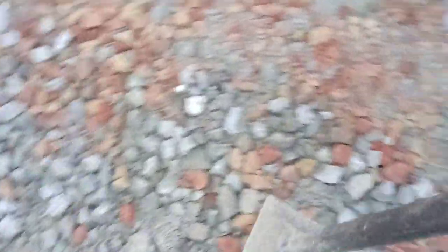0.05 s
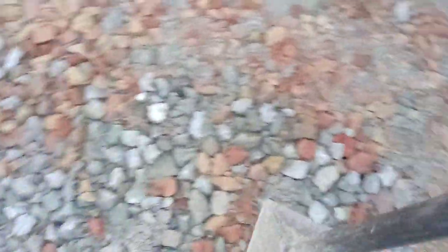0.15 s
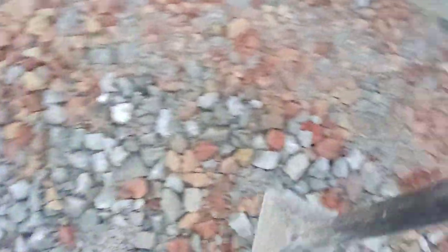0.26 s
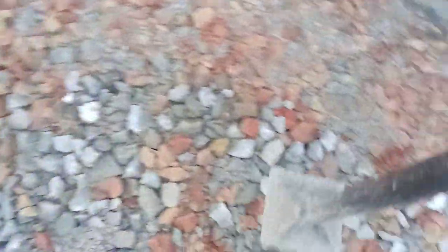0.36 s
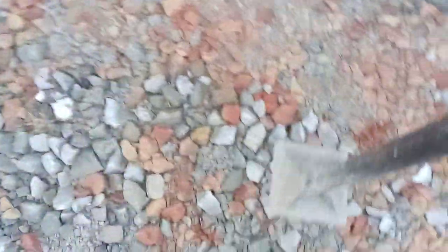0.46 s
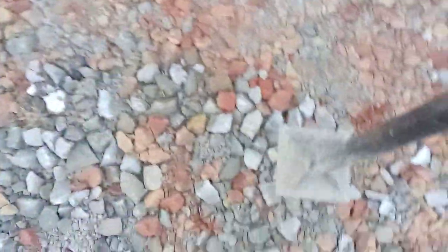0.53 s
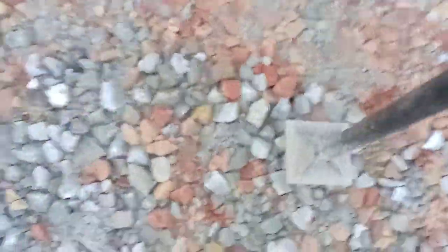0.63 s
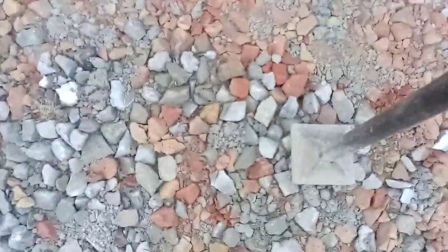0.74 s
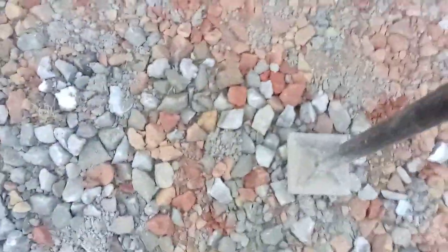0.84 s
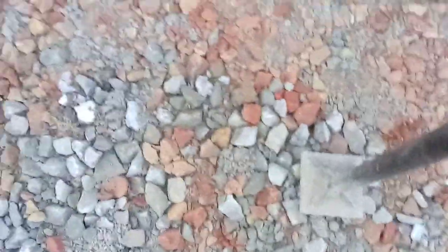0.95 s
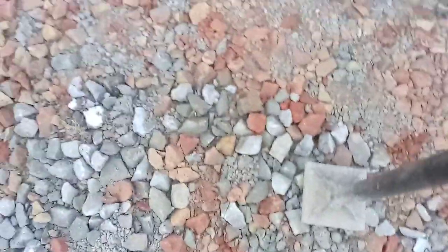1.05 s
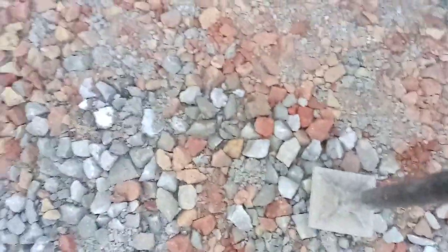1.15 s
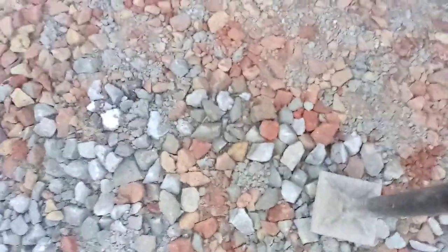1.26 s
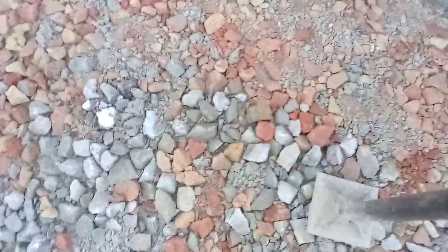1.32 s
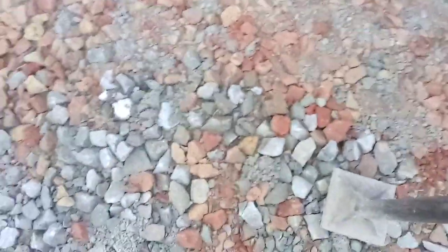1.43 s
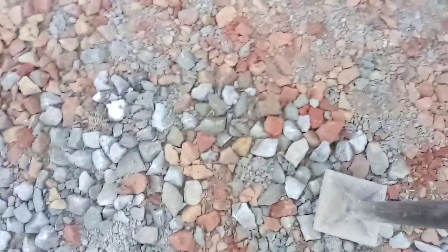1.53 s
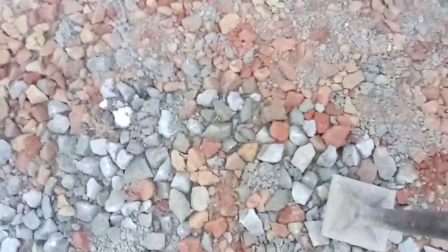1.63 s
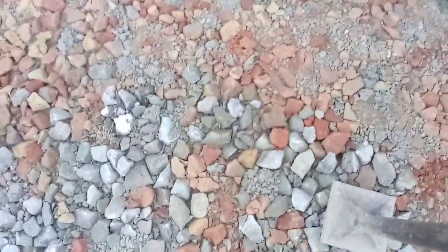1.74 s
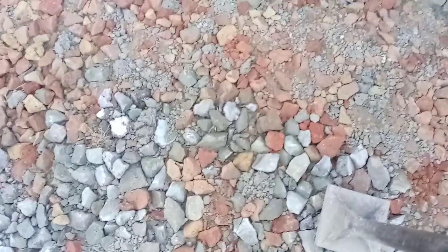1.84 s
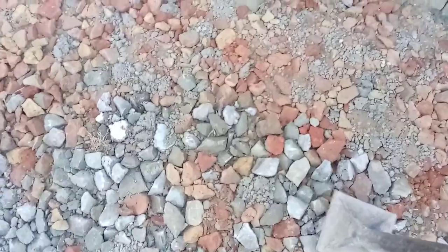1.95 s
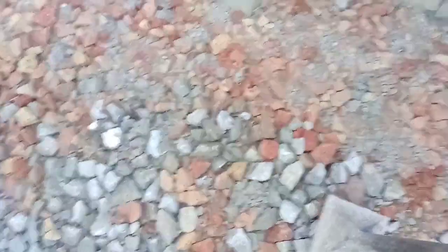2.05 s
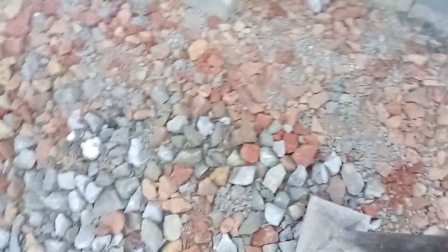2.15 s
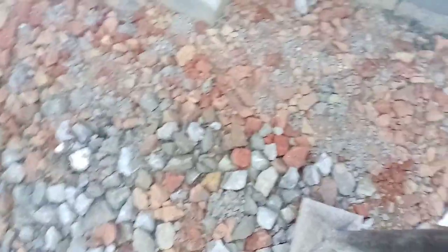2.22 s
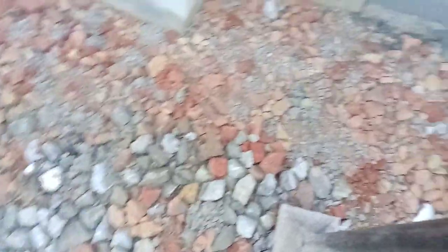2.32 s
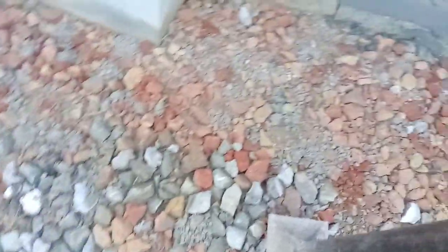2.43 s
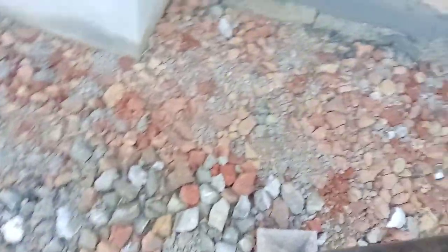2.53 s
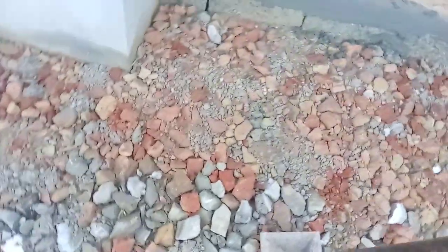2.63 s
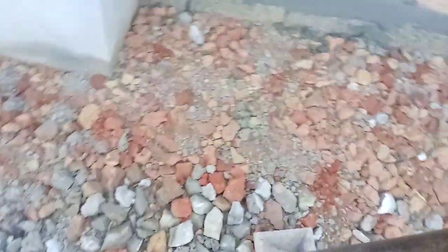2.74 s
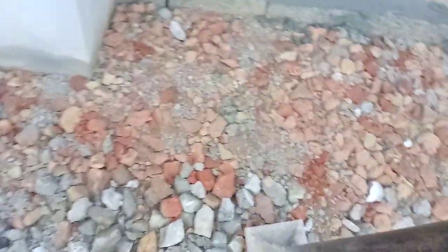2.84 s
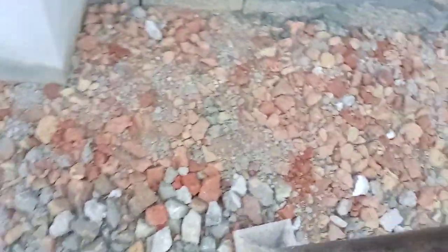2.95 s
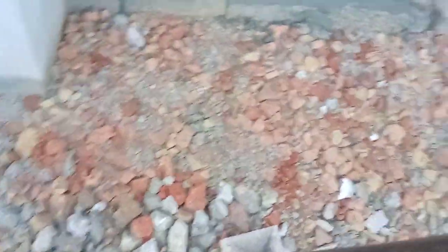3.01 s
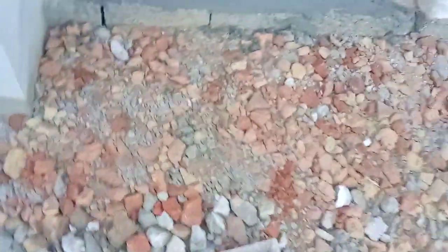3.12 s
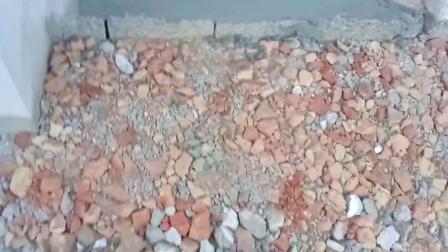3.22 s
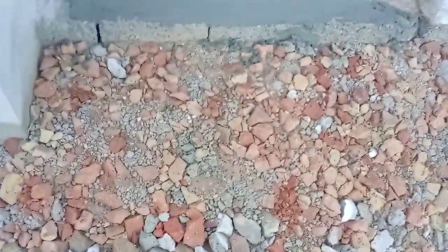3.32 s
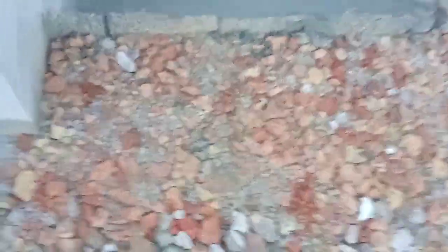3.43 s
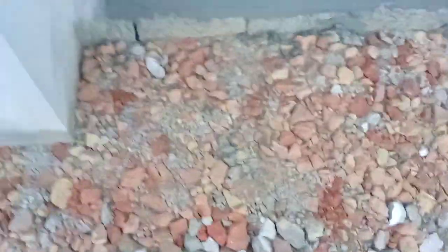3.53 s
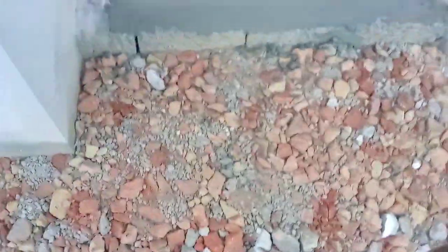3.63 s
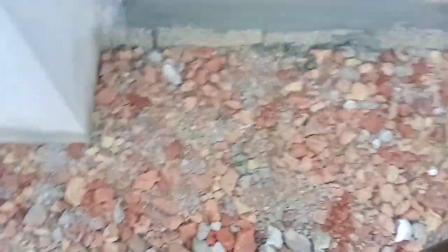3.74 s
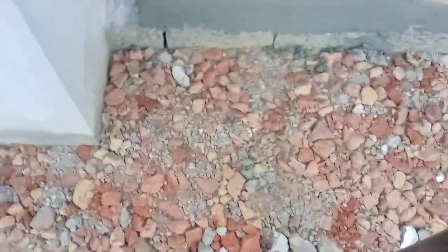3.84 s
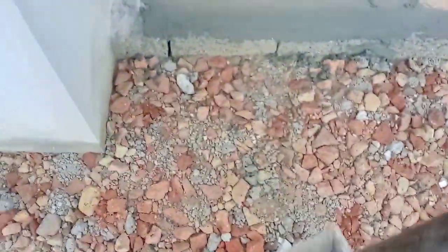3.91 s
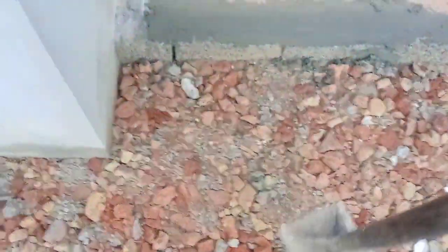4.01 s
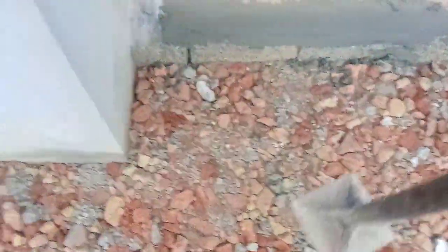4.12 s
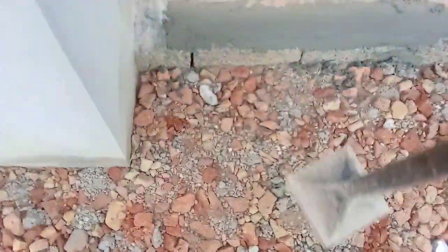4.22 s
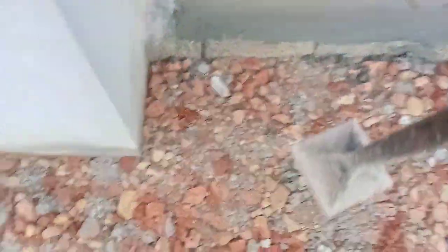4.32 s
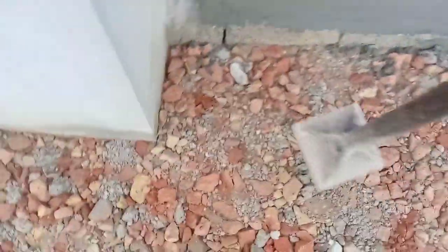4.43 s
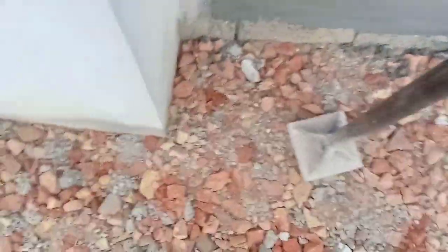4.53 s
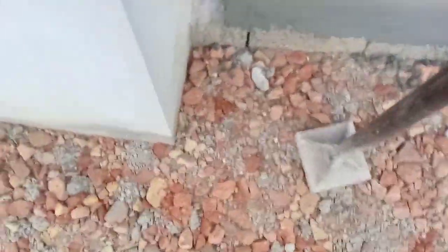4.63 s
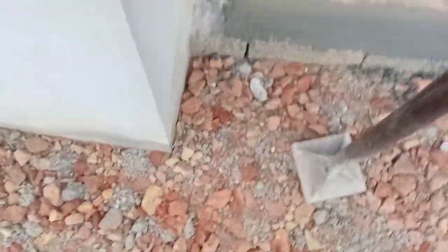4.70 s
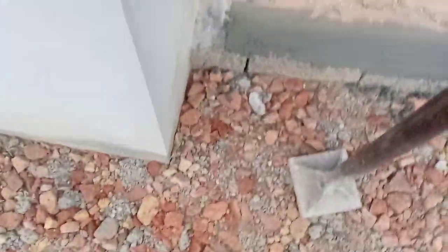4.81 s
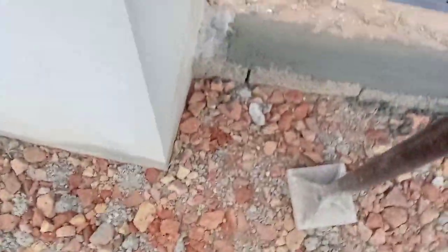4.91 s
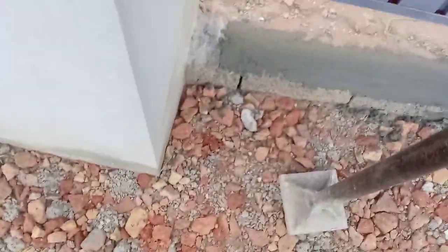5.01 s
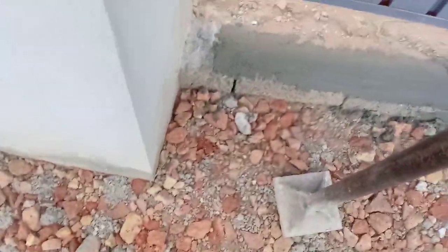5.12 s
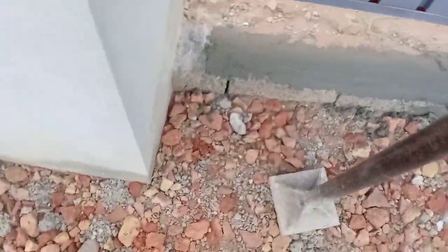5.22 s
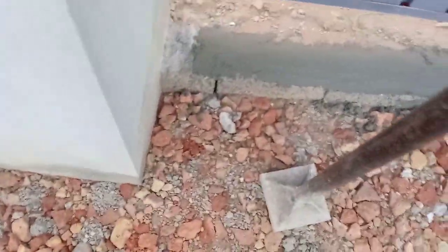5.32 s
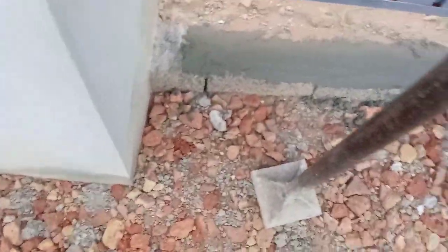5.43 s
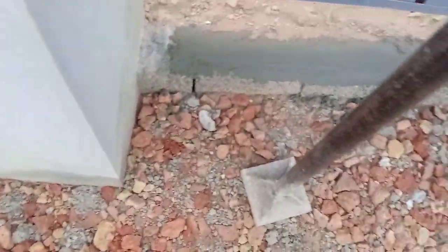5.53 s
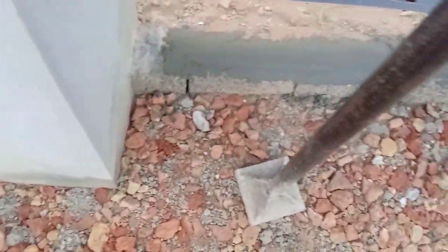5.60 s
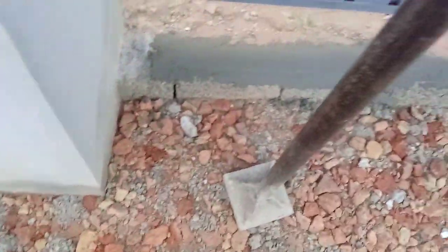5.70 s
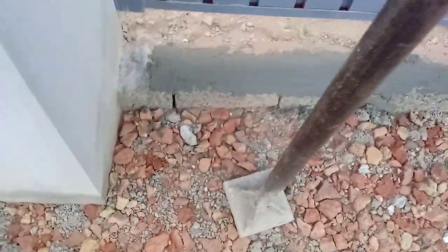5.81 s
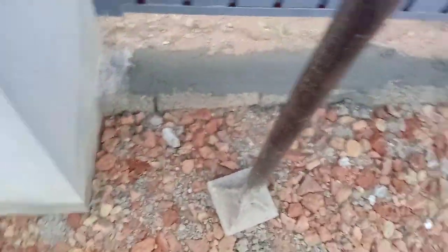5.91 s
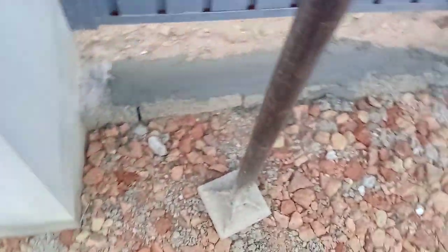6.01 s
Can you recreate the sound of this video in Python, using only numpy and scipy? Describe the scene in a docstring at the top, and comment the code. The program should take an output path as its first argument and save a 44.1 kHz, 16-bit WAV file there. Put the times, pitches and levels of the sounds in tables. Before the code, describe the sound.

A faint low outdoor rumble and soft hiss fill a walled yard, with quiet, rapid, even ticking throughout. At about 0.6 seconds a steel hand tamper lands close by on broken brick and gravel, giving a crunch, a dull thud and a short metallic ring. Feet shift softly just after. From 1 to 2.5 seconds the plate grazes the stones with light clinks, the clearest a gritty one near 1.9 seconds. Small distant birds chirp faintly, mostly between 2.8 and 4.5 seconds, while a few stones knock together. Shoes scuff on the gravel at about 4.3 seconds. At 4.5 seconds comes the second and loudest blow, a sharp crunch with a heavy thud and a bright ring, leaving a low rumble that fades over a second or so. Soft footfalls and tiny clinks follow until about 5.4 seconds, and the background carries on to 6 seconds.

```python
"""A low outdoor murmur, faint even ticking and small far-off birds are heard in a walled yard.
A steel hand tamper comes down twice on broken brick and gravel, first flat, then on its edge.
Each impact crushes stones, thuds into the ground and excites the modes of the plate; the second
leaves a long rumble by the wall. After each blow feet shift on the gravel, the plate rings softly
as it grazes stones, and stones knock together."""
import sys
import numpy as np
from scipy import signal
from scipy.fft import rfft, irfft, next_fast_len
from scipy.io import wavfile

SR = 44100
rng = np.random.default_rng(int(sys.argv[2]) if len(sys.argv) > 2 else 0)


def output_pcm(signal):
    """Save a mono or channel-first signal as 16-bit PCM at the path in sys.argv[1].

    Samples are clipped to [-1, 1] before scaling.
    """
    pcm = np.clip(np.atleast_2d(signal).T, -1, 1) * 32767
    wavfile.write(sys.argv[1], SR, np.round(pcm).astype(np.int16))


N = 267318
TIME = np.arange(N) / SR

# Noise spectra. Each row: frequency in Hz, relative level in dB.
MURMUR_SPECTRUM = [(20, -5), (45, -7), (75, 4.5), (120, 7), (170, -9.5), (260, -31.5), (500, -60.5)]
AIR_SPECTRUM = [(200, 2.5), (300, -3.5), (500, -7), (900, -4.5), (1130, -12), (1250, 3.5), (1400, -14),
                (2000, -12.5), (3200, -14), (5500, -14), (7500, -27.5), (8400, -35), (11000, -32),
                (14000, -33.5)]
CRUNCH_SPECTRUM = [(100, 2), (250, 5), (600, 0.5), (1100, 7.5), (1600, 3), (3000, -1.5), (4800, -3),
                   (6100, 0), (7000, -9), (8200, -18), (13500, -31), (15200, -21.5), (16000, -12)]
SCUFF_SPECTRUM = [(100, -24.5), (300, -6), (700, -3), (1000, -19), (1400, -5), (1900, 0), (2400, 0),
                  (3200, -2), (4300, 0.5), (5000, -4.5), (6200, -9), (7500, -19.5), (10000, -42),
                  (15000, -28.5)]
STEP_SPECTRUM = [(40, -68), (80, 21), (130, 3), (200, -10), (550, -7.5), (1000, -43.5), (3000, -68)]
GRIT_SPECTRUM = [(100, -25), (300, 12.5), (700, -2), (1400, 3.5), (2300, -3.5), (4500, 6.5), (6200, 4),
                 (8000, -16.5), (13000, -20), (15200, -10), (16000, -20)]
# Slow level contours. Each row: time in seconds, base level in dB.
MURMUR_CONTOUR = [(0.0, -61.5), (1.62, -58), (1.89, -51), (2.11, -59.5), (3.22, -61), (3.46, -55.5),
                  (4.25, -54.5), (4.64, -49), (5.23, -49), (6.06, -67)]
AIR_CONTOUR = [(0, -65), (1, -64.5), (2.5, -60.5), (4.2, -63), (5, -67.5), (6.06, -61.5)]
TICK_CONTOUR = [(0, -58), (.25, -49), (.9, -54), (1.5, -49), (2.4, -48.5), (3.1, -52.5), (3.6, -53),
                (3.9, -45), (5.5, -54), (6.06, -59)]
# Bands of thin hiss. Each row: centre in Hz, resonator width in Hz, level in dB.
HISS_BANDS = [(8870, 480, -83), (15100, 1000, -85.5)]
# Bird calls. Each row: start in seconds, length in seconds, middle pitch in Hz, glide in octaves,
# level in dB.
BIRD_CALLS = [(0.124, 0.12, 5580, 0.51, -62.5), (2.788, .09, 3780, -.23, -55.5),
              (3.054, 0.21, 3390, 0.18, -58), (3.348, 0.13, 4620, .26, -55.5),
              (3.62, .15, 3350, 0.14, -55.5), (3.95, 0.086, 3840, -0.46, -52),
              (4.203, 0.25, 3130, 0.045, -54.5), (5.24, 0.13, 4620, 0.33, -61)]
# Modes of plate and shaft. Each row: frequency in Hz, t60 (time to fall 60 dB) in seconds,
# then relative level in dB when struck flat, struck on the edge and grazed.
TAMPER_MODES = [(289.7, 0.51, -38.5, -41, -24), (901, 0.12, -38, -54.5, -16.5),
                (1242, 0.27, -12.5, -32.5, -0.5), (1340, 0.87, -32.5, -28, -6),
                (1861.6, 0.46, -27, -29.5, -8), (2370, 0.26, -54, -58.5, -28), (2458, 0.11, -19, -32, -6.5),
                (2910, 0.31, -47, -40, -24), (3036, 0.47, -38, -41, -17), (3126, 0.47, -46, -32, -24),
                (3142, 0.35, -37, -41.5, -10.5), (3710, 0.38, -28.5, -33.5, -15),
                (3883, .31, -30.5, -29, -6), (4020, 0.37, -47, -38, -21), (4130, .26, -43, -38, -35),
                (4700, 0.25, -51.5, -27.5, -10.5), (5420, 0.33, -43.5, -29, -13.5),
                (5484, 0.49, -58.5, -30.5, -11.5), (5820, .15, -43, -42.5, -27),
                (6060, 0.2, -51, -26.5, -4), (5830, 0.1, -31, -31, -17), (6028, .17, -48, -33, -2),
                (5940, 0.068, -34, -14, -0.5), (6065, 0.14, -31, -22.5, -18), (6350, 0.14, -51, -27, -8),
                (6450, 0.12, -50.5, -24.5, -30), (7030, .14, -41, -38, -11), (7240, 0.2, -52.5, -47.5, -14)]
MODE_HZ, MODE_T60, FLAT_DB, EDGE_DB, GRAZED_DB = np.transpose(TAMPER_MODES)
# Tamper blows. Each row: start in seconds, sinking-in time in seconds, share on the edge from 0 to 1,
# crunch in dB, thud in dB, thud pitch in Hz, yard echo in dB, wall rumble in dB.
TAMPER_BLOWS = [(.622, 0.015, 0, -22, -26.5, 106.3, -37, -56.5),
                (4.485, .007, 1, -15.5, -14, 119.6, -53, -32)]
# Reverberation. Each row: frequency in Hz, relative level in dB, t60 in seconds.
YARD_ECHO = [(200, 5, 0.13), (704, -2, 0.64), (1500, -17, 0.48), (2106, 6, 0.43), (3000, 6, 0.28),
             (4000, -3, 0.54), (5000, 5.5, 0.38), (5830, -12.5, 0.28), (8000, -56, .25), (15000, -40, .2)]
WALL_RUMBLE = [(50, -25, 3.1), (95, 1.5, 1.5), (154, 1, 3.5), (204, -6.5, 2.13), (370, -5, 2.51),
               (686, -2, 1.6), (920, -14, 1.15), (1180, -3.5, 1.35), (1500, -20, 1.18), (2760, -13, 0.49),
               (4760, -29, 0.29), (9000, -58.5, .3)]
# Feet on gravel. Each row: start in seconds, level in dB, rise in seconds, t60 in seconds.
FOOT_SCUFFS = [(1.14, -61, 0.066, 1), (3.31, -63.5, 0.12, 1), (3.885, -50.5, 0.05, 0.11),
               (4.295, -34.5, 0.037, 0.53), (4.325, -37.5, 0.053, 0.55)]
FOOTFALLS = [(0.781, -44.5, 0.024, 0.23), (0.827, -39.5, 0.024, 0.1), (0.995, -45, 0.044, 0.35),
             (1.931, -47.5, 0.014, 0.65), (3.92, -44, 0.045, 0.12), (4.285, -38.5, 0.0196, 0.26),
             (5.161, -39, 0.0095, 0.18), (5.37, -39, 0.045, 0.24)]
# Resonances of scuffed gravel. Each row: centre in Hz, width in Hz, relative gain in dB.
GRAVEL_RESONANCES = [(634, 69, -1), (1230, 62, 3), (2300, 250, -5), (3140, 350, -0.5), (3740, 140, -8),
                     (4790, 190, -0.5)]
# The plate grazing stones. Each row: start in seconds, ring gain in dB, contact time in seconds,
# favoured pitch in Hz, grit level in dB.
PLATE_GRAZES = [(1.01, -64.5, 0.032, 2410, -70), (1.311, -58.5, 0.078, 5400, -59),
                (1.45, -56, 0.022, 1860, -60), (1.562, -56.5, 0.0042, 6000, -64.5),
                (1.599, -72, 0.057, 3830, -80), (1.92, -47.5, 0.004, 3030, -58),
                (1.934, -46, 0.012, 4260, -39), (2.017, -64.5, 0.021, 3070, -61),
                (2.161, -65.5, 0.029, 4700, -72), (2.249, -57.5, 0.013, 4740, -56.5),
                (2.462, -56, 0.015, 2450, -61), (2.552, -68.5, .014, 2450, -63),
                (4.984, -57.5, 0.018, 5440, -61), (5.047, -67.5, 0.017, 1860, -73.5),
                (5.19, -66.5, 0.034, 5270, -78), (5.38, -68, 0.026, 5440, -73)]
# Stones knocking together. Each row: start in seconds, level in dB, pitch in Hz, t60 in seconds.
STONE_KNOCKS = [(1.385, -37, 1940, 0.011), (1.385, -33, 1770, 0.017), (3.164, -49.5, 1170, 0.32),
                (3.473, -40, 1860, 0.034), (3.9, -42.5, 1130, 0.15), (3.913, -50, 1340, 0.28),
                (3.928, -43, 1460, 0.074), (3.956, -48, 940, 0.06), (4.783, -50.5, 5750, 0.025)]


def amp(db):
    """Amplitude ratio for a level in decibels."""
    return np.exp(np.asarray(db) * (np.log(10) / 20))


def unit_rms(x):
    """The signal scaled to rms 1."""
    return x / np.sqrt(np.mean(x ** 2) + 1e-20)


def at_hz(hz, points_hz, values):
    """Interpolation on a logarithmic frequency axis."""
    return np.interp(np.log(hz + 1e-9), np.log(points_hz), values)


def noise(spectrum, size=N):
    """Spectral shaping: white noise takes on the given colour, at rms 1."""
    n = next_fast_len(size)
    bin_hz = np.arange(n // 2 + 1) * SR / n
    gain = amp(at_hz(bin_hz, *np.transpose(spectrum)))
    white = rng.standard_normal(n)
    return unit_rms(irfft(rfft(white) * gain, n)[:size])


def drift(rate_hz, size=N):
    """Random modulation: Gaussian values of spread 1, joined by straight lines."""
    knots = rng.standard_normal(size // 20)
    return np.interp(TIME[:size] * rate_hz, np.arange(len(knots)), knots)


def resonate(x, hz, width_hz):
    """A second-order resonance with unit gain at its peak."""
    radius = np.exp(-np.pi * width_hz / SR)
    feedforward = np.array([1, 0, -1]) * (1 - radius ** 2) / 2
    feedback = [1, -2 * radius * np.cos(2 * np.pi * hz / SR), radius ** 2]
    return signal.lfilter(feedforward, feedback, x + 1e-18)


def narrow_noise(hz, width_hz, size=N):
    """Narrow-band noise: white noise through two equal resonances, at rms 1."""
    once = resonate(rng.standard_normal(size), hz, width_hz)
    return unit_rms(resonate(once, hz, width_hz))


def swell(rise, t60, size=SR):
    """Envelope of a damped vibration: linear rise, then exponential decay."""
    t = TIME[:size]
    return np.minimum(t / rise, 1) * np.exp(-np.log(1000) * np.maximum(t - rise, 0) / t60)


def add(track, start_s, sound):
    """Superposition: a sound joins the track at its start time."""
    first = max(round(start_s * SR), 0)
    track[first:first + len(sound)] += sound[:N - first]


def background(murmur_boost_db=2.5):
    """Random amplitude modulation of noise gives a lumpy murmur, soft air and a flickering hiss."""
    murmur_db = np.interp(TIME, *np.transpose(MURMUR_CONTOUR)) + murmur_boost_db + 3.5 * drift(22)
    murmur = amp(murmur_db) * noise(MURMUR_SPECTRUM)
    air_db = np.interp(TIME, *np.transpose(AIR_CONTOUR)) + drift(5.6)
    air = amp(air_db) * noise(AIR_SPECTRUM)
    hiss = sum(amp(db + 3.5 * drift(18)) * narrow_noise(hz, width) for hz, width, db in HISS_BANDS)
    return murmur + air + hiss


def ticking(first_s=0.0704, period_s=0.08897, pitch_hz=1274, ring_hz=1267.6, size=SR // 5):
    """A periodic train of damped oscillations: each tick is a pip, a speck of noise and an after-ring."""
    out, t = np.zeros(N), TIME[:size]
    starts = np.arange(first_s, TIME[-1], period_s)
    deviations = np.clip(rng.standard_normal((len(starts), 2)), -2, 2)
    for start, (strength, detune) in zip(starts, deviations):
        db = np.interp(start, *np.transpose(TICK_CONTOUR)) + 2 * strength
        hz = pitch_hz * 2 ** (0.08 * detune)
        pip = np.sin(2 * np.pi * hz * t) * swell(0.0028, 0.024, size)
        speck = amp(-10) * narrow_noise(hz, 780, size) * swell(0.00075, 0.058, size)
        ring = amp(-7.5) * np.sin(2 * np.pi * ring_hz * t) * swell(0.018, 0.076, size)
        add(out, start, amp(db) * (pip + speck + ring))
    return out


def birds(chatter_db=-66, chatter_count=50, arch_octaves=0.065, size=SR // 5):
    """Frequency-modulated whistles, smeared by distance, glide in arches among fainter random calls."""
    out = np.zeros(N)
    chatter = [(TIME[-1] * when, 0.086, 2000 + 3440 * pitch, 0.46 * (2 * slope - 1), chatter_db)
               for when, pitch, slope in rng.random((chatter_count, 3))]
    for start, length, middle_hz, glide, db in BIRD_CALLS + chatter:
        progress = np.minimum(TIME[:size] / length, 1)
        octaves = glide * (progress - 0.5) - arch_octaves * (2 * progress - 1) ** 2
        whistle = np.exp(2j * np.pi * np.cumsum(middle_hz * 2 ** octaves) / SR)
        # A random complex gain blurs both amplitude and phase.
        scatter = sum(share * (drift(rate_hz, size) + 1j * drift(rate_hz, size))
                      for rate_hz, share in [(230, 0.6), (1100, 0.32)])
        add(out, start, amp(db) * np.sin(np.pi * progress) * np.real(scatter * whistle))
    return out


def plate_ring(levels_db, rise, linger_db, size=SR):
    """Modal vibration builds as stones press on the steel; a weak part lingers as the load comes off."""
    out, t = np.zeros(size), TIME[:size]
    for hz, t60, db in zip(MODE_HZ, MODE_T60, levels_db):
        loaded = np.minimum(t / rise, 1) * swell(rise, t60, size)
        lingering = amp(linger_db) * swell(0.015, t60 * 3.5, size)
        wavering_gain = amp(db + drift(70, size))
        out += wavering_gain * (loaded + lingering) * np.sin(2 * np.pi * (hz * t + rng.random()))
    return out


def fracture(spectrum, rough_db, size=SR):
    """Brittle fracture of stone radiates noise in millisecond bursts."""
    smooth = noise(spectrum, size)
    bursts = amp(rough_db * np.clip(drift(900, size), -2, 2))
    return unit_rms(smooth * bursts)


def reverberation(table, rise, size):
    """Scattered reflections form a diffuse field, each third-octave band decaying at its own rate."""
    points_hz, levels_db, t60s = np.transpose(table)
    edges_hz = np.geomspace(45, 16000, 26)
    white = rng.standard_normal((2, size))   # neighbouring bands draw on independent noise
    out, power = 0, 0
    for k, (low, high) in enumerate(zip(edges_hz, edges_hz[1:])):
        hz = np.sqrt(low * high)
        bandpass = signal.butter(3, [low, high], "band", fs=SR, output="sos")
        band = amp(at_hz(hz, points_hz, levels_db)) * signal.sosfilt(bandpass, white[k % 2])
        out = out + band * swell(rise, at_hz(hz, points_hz, t60s), size)
        power += np.mean(band ** 2)
    return out / np.sqrt(power)


def tamper_blows():
    """Impact excitation: the steel rings, stones crack, the ground thuds and the walls reflect it."""
    out, t = np.zeros(N), TIME[:SR]
    for start, sink, edge, crunch_db, thud_db, thud_hz, echo_db, rumble_db in TAMPER_BLOWS:
        ring = plate_ring(FLAT_DB + edge * (EDGE_DB - FLAT_DB), sink, linger_db=-33.5)
        # The ring holds its level for about 70 ms, then drops quickly.
        hold = amp(3.9 * np.exp(-((t - 0.075) / 0.04) ** 2))
        load = 0.078 * swell(0.0005, 0.034) + swell(sink * 0.47, 0.07)   # first touch, then full weight
        crunch = amp(crunch_db) * fracture(CRUNCH_SPECTRUM, rough_db=-3) * load
        thud = amp(thud_db) * np.sin(2 * np.pi * thud_hz * t) * swell(0.007, 0.061)
        add(out, start, ring * hold + crunch)
        add(out, start + 0.0041, thud)
        add(out, start + sink, amp(echo_db) * reverberation(YARD_ECHO, rise=0.069, size=SR))
        add(out, start + sink, amp(rumble_db) * reverberation(WALL_RUMBLE, rise=0.11, size=2 * SR))
    return out


def feet():
    """Sliding friction: soles gather speed over loose gravel; weight settles with a soft thump."""
    out = np.zeros(N)
    for start, db, rise, t60 in FOOT_SCUFFS:
        friction = fracture(SCUFF_SPECTRUM, rough_db=np.sqrt(2))
        gravel = sum(amp(gain_db) * resonate(friction, hz, width)
                     for hz, width, gain_db in GRAVEL_RESONANCES)
        scuff = unit_rms(0.28 * friction + gravel)
        speed = np.minimum(TIME[:SR] / rise, 1) ** 2
        add(out, start, amp(db) * scuff * speed * swell(rise, t60))
    for start, db, rise, t60 in FOOTFALLS:
        add(out, start, amp(db) * noise(STEP_SPECTRUM, SR) * swell(rise, t60))
    return out


def plate_grazes(size=SR // 2):
    """Light contact grinds grit and excites the modes unevenly; that nearest the favoured pitch sings."""
    out = np.zeros(N)
    for start, db, contact, favoured_hz, grit_db in PLATE_GRAZES:
        favour_db = 8 * np.exp(-(np.log2(MODE_HZ / favoured_hz) / 0.095) ** 2)
        chance_db = 4 * np.clip(rng.standard_normal(len(MODE_HZ)), -2, 1.3)
        ring = plate_ring(db + GRAZED_DB + favour_db + chance_db, contact, linger_db=-4, size=size)
        singing_hz = MODE_HZ[np.argmin(np.abs(MODE_HZ - favoured_hz))]
        singing = amp(db - 11.5) * np.sin(2 * np.pi * singing_hz * TIME[:size])
        grit = amp(grit_db) * fracture(GRIT_SPECTRUM, rough_db=3, size=size)
        for sound, t60 in [(ring, 0.41), (singing, 0.6), (grit, 0.15)]:
            add(out, start, sound * swell(contact, t60, size))
    return out


def stone_knocks(size=SR // 5):
    """A collision between stones gives a dry crack with one broad resonance."""
    out = np.zeros(N)
    for start, db, hz, t60 in STONE_KNOCKS:
        crack = noise(GRIT_SPECTRUM, size)
        knock = unit_rms(resonate(crack, hz, width_hz=330) + 0.061 * crack)
        add(out, start, amp(db) * knock * swell(0.0004, t60, size))
    return out


def scene():
    """The pressures of all sources add at one microphone above the gravel."""
    work = tamper_blows() + plate_grazes() + stone_knocks() + feet()
    return (work + ticking() + birds() + background())[None]


def record(dry, low_hz=58, high_hz=15750):
    """Band limiting: the small microphone loses the deep bass, and the top is cut steeply."""
    highpass = signal.butter(3, low_hz, "high", fs=SR, output="sos")
    lowpass = signal.ellip(10, 0.3, 80, high_hz, fs=SR, output="sos")
    return signal.sosfilt(lowpass, signal.sosfilt(highpass, dry))


dry = scene()
out = record(dry)
output_pcm(out)
```